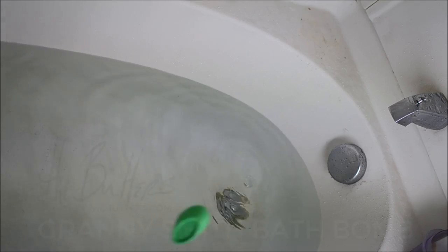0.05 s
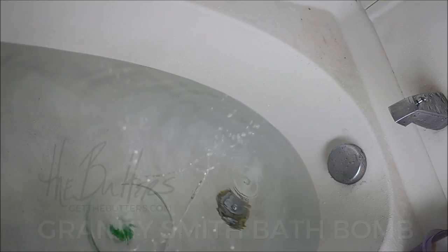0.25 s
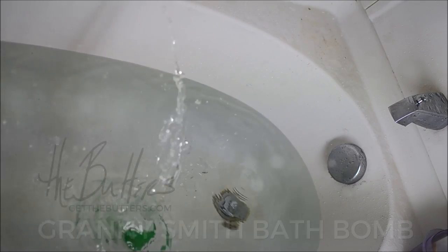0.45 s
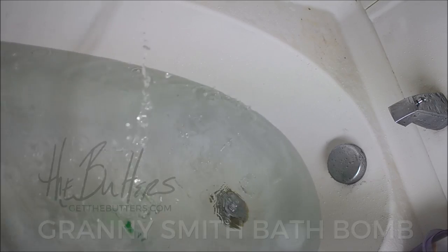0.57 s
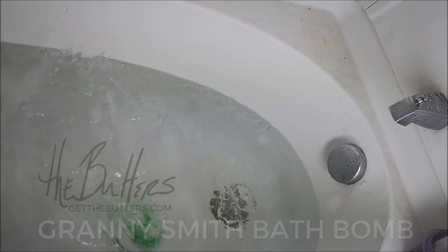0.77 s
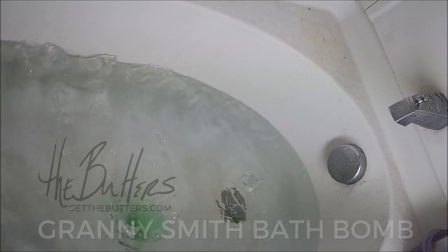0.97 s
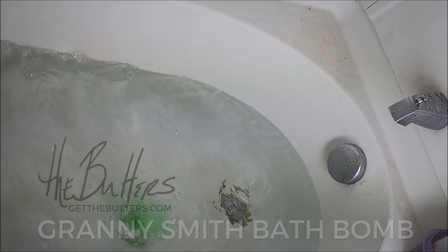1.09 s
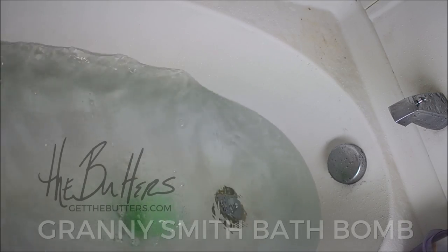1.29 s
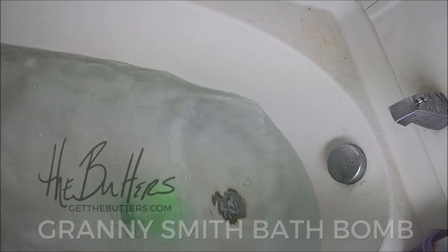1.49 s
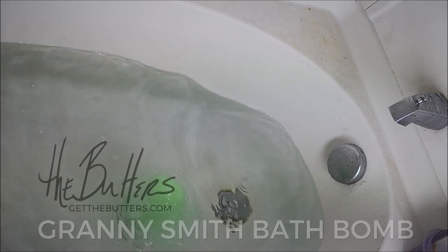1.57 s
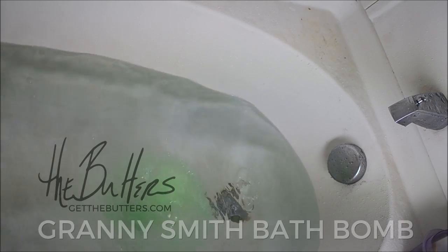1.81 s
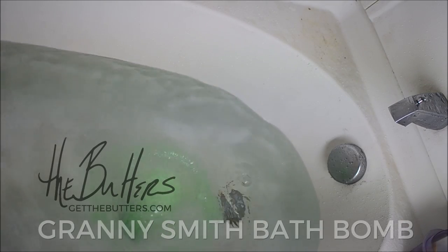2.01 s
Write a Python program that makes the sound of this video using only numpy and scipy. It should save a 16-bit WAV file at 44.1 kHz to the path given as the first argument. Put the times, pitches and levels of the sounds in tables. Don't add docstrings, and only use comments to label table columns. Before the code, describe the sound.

A solid ball plunges into a filled bathtub with a hard thud, splash and bubbling

```python
import sys
import numpy as np
from scipy import signal
from scipy.fft import rfft, irfft, next_fast_len
from scipy.io import wavfile
from scipy.ndimage import uniform_filter1d, map_coordinates

SR = 44100
rng = np.random.default_rng(int(sys.argv[2]) if len(sys.argv) > 2 else 0)


def int16_out(signal):
    q = np.round(np.clip(np.atleast_2d(signal).T, -1, 1) * 32767)
    wavfile.write(sys.argv[1], SR, q.astype(np.int16))


def nominal_scale(level):
    x = np.asarray(level, float) / 20
    return 10 ** x


N = 90404

# (frequency [Hz], density [dB per Hz])
HUM_SPECTRUM = [(30, -1), (70, -4.5), (200, -3.5), (620, -6.5), (1200, -9.5), (2500, -17), (5000, -34),
                (16000, -43)]
HUM_DB = -59

# (time [s], peak [dB], centre [Hz])
DROPLETS = [(0.0743, -46, 8650), (0.157, -36, 9300), (.373, -39, 8300), (0.435, -36, 6650),
            (.5203, -48, 6600), (0.582, -26.5, 6240), (.757, -39, 7400), (.838, -43.5, 7870),
            (0.867, -40, 5140), (0.89, -32, 11200), (0.986, -43.5, 10400), (0.9976, -42, 6240),
            (1.031, -46, 9000), (1.11, -48.5, 9900), (1.1753, -46, 12500), (1.176, -42, 4400),
            (1.2542, -47.5, 9200), (1.299, -52, 8850), (1.375, -54, 5500), (1.437, -43.5, 5450)]
DROPLET_T60_S, DROPLET_WIDTH_NEPER, DROPLET_DIRECT_DB = 0.014, 0.3, -8

# (frequency [Hz], level [dB], t60 [s])
LOW_MODES = [(76.3, -12.5, 0.58), (126.74, -10.5, 0.4), (173.6, -2, 0.17), (228.7, -3.5, 0.23),
             (323, -23, 0.29)]
HIGH_MODES = [(450, -26.5, 0.3), (652, -10, 0.31), (709.6, 2.5, 0.1), (779.3, -3.5, 0.14), (805, -17, 0.53),
              (954.4, -17, 0.35), (1342, -17.5, 0.43), (1560, -18.5, 0.33), (1705, -12.5, 0.18),
              (1793, -18.5, 0.24), (2110, -25, 0.5), (2133, -20, 0.25)]
# (time [s], level [dB], rise [s])
LOW_BLOWS = [
    (0.154, -46.5, 0.005),
    (0.2374, -32, 0.0043),
    (0.2612, -11, 0.0045),
    (0.2844, -13, 0.0036),
]
# (time [s], level [dB], rise [s])
HIGH_BLOWS = [
    (.2575, -8.5, 0.00067),
]
MODE_WANDER, MODE_WANDER_HZ, MODE_STEADY_S = 1.3, 35, 0.1

# (time [s], level [dB], rise [s], t60 [s], corner [Hz])
TORN_WATER = [(.156, -40.5, 0.00041, 0.042, 5200), (0.157, -40.5, 0.0038, 0.5, 1290),
              (0.236, -20, 0.0034, 0.28, 820), (0.2572, -15, 0.0012, 0.22, 1660),
              (0.258, -32, 0.00084, 0.12, 7100), (0.334, -44, 0.008, 0.11, 6300),
              (0.377, -35, 0.027, 0.27, 2230), (0.575, -40, 0.0068, 0.075, 5900),
              (0.633, -40.5, 0.022, 0.46, 6860), (0.664, -42, 0.0019, 0.19, 8900),
              (.86, -48, 0.092, 0.91, 450), (0.999, -45, 0.062, 0.33, 350),
              (0.888, -44.5, 0.00067, 0.068, 13000), (1.172, -49, .004, 0.087, 1500)]
TORN_WATER_SLOPE = 2.3

# (time [s], pitch [Hz], peak [dB], life [cycles])
SPLASH_BUBBLES = [(0.2348, 1476, -19, 7.7), (.236, 208.6, -6.5, 6.1), (.239, 973, -11.5, 6.3),
                  (.2385, 590, -30, 1.5), (.2608, 695, -1, 5), (.279, 683, -15.5, 12),
                  (.325, 653, -9.5, 8.1), (0.349, 916, -14.5, 11.4), (0.389, 167.4, -19.5, 6.4),
                  (0.466, 166.2, -26.5, 7.9), (.472, 555, -24, 4), (0.318, 1680, -14.5, 10.4),
                  (.388, 1670, -24, 28), (0.406, 2780, -25.5, 11.5), (.478, 359, -33.5, 18),
                  (0.527, 1344, -28.5, 18.5), (.552, 1470, -36, 23), (0.529, 2880, -42, 8),
                  (.542, 715, -28, 8.7), (0.56, 982, -29.5, 12), (0.5759, 2374, -22, 21),
                  (0.578, 6300, -31.5, 18), (0.602, 2560, -34, 16), (0.626, 3137, -32.5, 43),
                  (0.638, 6140, -38, 44), (.656, 1009, -11, 8.3), (0.668, 840, -11.5, 1.85),
                  (0.689, 1495, -34, 73), (0.698, 4470, -26, 22), (0.715, 3930, -26.5, 18),
                  (0.719, 1365, -29.5, 9.6), (.722, 625, -21.5, 5.8), (0.898, 3630, -45, 19)]
LATE_BUBBLES = [(.9, 341, -47, 15), (.92, 584, -36.5, 10.2), (1.044, 980, -32, 7.3),
                (1.049, 4000, -42.5, 29), (1.29, 346, -46, 20), (1.169, 230, -51, 4),
                (1.26, 3860, -53.5, 20), (1.436, 4850, -52, 28), (1.469, 1550, -45, 12),
                (1.498, 2000, -47.5, 14), (1.547, 2500, -47.5, 20), (1.652, 1043, -43, 12.4),
                (1.666, 2490, -42.5, 18), (1.697, 1420, -46.5, 16), (1.848, 2170, -44.5, 17),
                (1.98, 4100, -52, 25), (1.923, 2060, -46, 14), (1.925, 599, -48.5, 35),
                (2.022, 980, -50, 17)]
PITCH_RISE, ONSET_CYCLES = 0.12, 2.1
SATELLITE_DB, SATELLITE_SCATTER_DB, SATELLITE_DELAY_S, SATELLITE_SPREAD = -7, 3, 0.044, 0.067
LONE_BELOW_HZ = 450

# (time [s], level [dB], middle bubble pitch [Hz])
CHURN_COURSE = [(0.251, -43, 1405), (0.299, -30, 1264), (0.411, -41, 1210), (0.47, -64.5, 940),
                (0.521, -45.5, 1208), (0.579, -48, 2130), (0.651, -37.5, 1924), (0.679, -31.5, 1181),
                (0.73, -43.5, 1610), (0.781, -49.5, 2080), (0.831, -50.5, 2654), (0.952, -50.5, 1480),
                (1.029, -56.5, 1474), (1.063, -55.5, 1170), (1.098, -65.5, 935), (1.43, -64.5, 1078),
                (1.5, -60, 2080), (2.05, -56, 2020)]
CHURN_LIFE_CYCLES, CHURN_SPREAD, CHURN_SIZE_DB = 7, 0.45, 1.5
STRENGTH_CAP = 2.2
# (frequency [Hz], density [dB per Hz])
SPRAY_SPECTRUM = [(120, -49), (400, 5), (1000, -15), (3000, 4.5), (6000, -21), (11000, -20.5),
                  (16000, -40.5)]
SPRAY_DB = -8.5

# (time [s], level [dB], rise [s], t60 [s], centre [Hz], width [octaves])
FROTH_CLOUDS = [(0.377, -37, 0.0065, 0.21, 2710, 0.096), (.385, -38, .004, 0.18, 1760, 0.18),
                (0.574, -38.5, 0.0015, 0.23, 2430, 0.37), (.615, -35.5, 0.0087, 0.22, 1794, 0.24),
                (.666, -35.5, 0.0014, 0.25, 790, 0.54), (0.686, -35, 0.0077, 0.15, 1540, 0.089),
                (0.698, -42, 0.0019, 0.22, 5000, 0.18), (0.715, -40.5, .003, 0.25, 3900, 0.18),
                (.765, -50.5, 0.0068, 0.38, 640, 0.046), (.786, -36, 0.0054, 0.16, 2730, 0.15),
                (.84, -50, 0.0048, 0.32, 2430, 0.1), (0.939, -48.5, 0.0031, 0.15, 2880, 0.23),
                (1.0, -48, 0.011, 0.25, 3030, 0.22), (1.033, -37, 0.0095, 0.16, 930, .35),
                (1.173, -54, 0.0018, 0.14, 11200, 0.19), (1.365, -62, .004, .15, 3100, .2),
                (1.452, -55, 0.0059, 0.27, 1800, .25), (1.5, -59, 0.025, 0.53, 2380, .2),
                (1.55, -60, .04, .8, 3500, .25), (1.63, -57, 0.017, .5, 2200, .12),
                (1.649, -61, .02, 0.34, 3300, .15), (1.755, -55, 0.0054, 0.44, 914, .1),
                (1.86, -56, 0.014, 1.2, 923, 0.14), (1.9, -54.5, .03, 1.3, 2310, .2),
                (1.952, -60, .03, 1.1, 3650, 0.31)]

# (frequency [Hz], density [dB per Hz])
FIZZ_SPECTRUM = [(1500, -37), (3000, 0), (6000, -3.5), (11000, -4), (14000, -8), (16000, -14)]
FIZZ_DB, FIZZ_POP_DB, FIZZ_START_S, FIZZ_RISE_S = -65.5, -7, 0.64, 1

# (frequency [Hz], t60 [s])
ROOM_T60 = [(150, 0.69), (800, 0.28), (3000, 0.037), (8000, 0.21), (15000, 0.25)]
WATER_WET_DB, SHELL_WET_DB, ROOM_GAP_S = -8.5, -15, 0.0049

# (time [s], length [s], from [Hz], to [Hz])
BAND_LOSSES = [(.326, .009, 3800, 20000), (.389, .011, 3800, 20000), (.794, .008, 5200, 20000),
               (.79, .014, 3350, 3750), (.79, .014, 1750, 2200), (.787, .018, 750, 1300),
               (.787, .018, 250, 520), (.923, .006, 4300, 20000), (.915, .02, 3000, 3500)]
BAND_LOSS_DB = -45
# (frequency [Hz], gain [dB])
BAND_TOP = [(15720, 0), (15800, -24), (16400, -28), (16500, -90)]
MIC_LOW_HZ, MIC_TOP_HZ, START_S = 52, 19000, 0.0115


def unit(x):
    return x / np.sqrt(np.mean(x ** 2) + 1e-20)


def along(points, hz):
    f, v = np.transpose(points)
    return np.interp(np.log(hz + 1), np.log(f + 1), v)


def filtered(x, response):
    m = next_fast_len(len(x) + 8192)
    spectrum = rfft(x, m) * response(np.fft.rfftfreq(m, 1 / SR))
    return irfft(spectrum, m)[:len(x)]


def hiss(spectrum, patchy_db):
    z = signal.stft(rng.standard_normal(N), nperseg=256)[2]
    field = uniform_filter1d(rng.standard_normal(z.shape), 5, 0)
    field = unit(uniform_filter1d(field, 8, 1))
    x = signal.istft(z * nominal_scale(patchy_db * field), nperseg=256)[1][:N]
    return unit(filtered(x, lambda hz: nominal_scale(along(spectrum, hz))))


def add(out, s, x):
    part = out[round(s * SR):][:len(x)]
    part += x[:len(part)]


def swell(t, db, rise, t60):
    return nominal_scale(db - 60 * t / t60) * -np.expm1(-t / rise)


def bubbles(s, hz, db, cycles, size):
    s, hz, db, cycles = (np.asarray(v)[:, None] for v in (s, hz, db, cycles))
    n = np.arange(size)
    turns = hz * n / SR
    age = turns / cycles
    envelope = nominal_scale(db - 20 * age) * -np.expm1(-turns / ONSET_CYCLES)
    wave = envelope * np.sin(2 * np.pi * turns * (1 + PITCH_RISE * np.tanh(age) / 2))
    place = (s * SR).astype(int) + n
    return np.bincount(place.ravel(), wave.ravel(), N + size)[:N]


def house_hum():
    return nominal_scale(HUM_DB) * hiss(HUM_SPECTRUM, patchy_db=1)


def droplets():
    out, t = np.zeros(N), np.arange(SR // 20) / SR
    for s, db, hz in DROPLETS:
        noise = filtered(rng.standard_normal(len(t)),
                         lambda f: np.exp(-.5 * (np.log((f + 1) / hz) / DROPLET_WIDTH_NEPER) ** 2))
        add(out, s, nominal_scale(db - 60 * t / DROPLET_T60_S) * unit(noise))
    return out


def tub_shell():
    out, t = np.zeros(N), np.arange(SR) / SR
    wander = MODE_WANDER * -np.expm1(-t / MODE_STEADY_S)
    for modes, blows in ((LOW_MODES, LOW_BLOWS), (HIGH_MODES, HIGH_BLOWS)):
        knots = rng.standard_normal((len(modes), 2, 100))
        ring = 0
        for k, (hz, db, t60) in enumerate(modes):
            sway, slip = (wander * map_coordinates(v, [t * MODE_WANDER_HZ]) for v in knots[k])
            level = nominal_scale(db - 60 * t / t60 + 1.5 * sway)
            ring = ring + (-1) ** k * level * np.sin(2 * np.pi * hz * t + slip)
        for s, db, rise in blows:
            add(out, s, nominal_scale(db) * ring * -np.expm1(-t / rise))
    return out


def torn_water():
    out, t = np.zeros(N), np.arange(SR // 2) / SR
    for s, db, rise, t60, hz in TORN_WATER:
        noise = filtered(rng.standard_normal(len(t)),
                         lambda f: f * f / (f * f + (0.2 * hz) ** 2) / (1 + (f / hz) ** TORN_WATER_SLOPE))
        add(out, s, swell(t, db, rise, t60) * unit(noise))
    return out


def single_bubbles(count):
    s, hz, db, cycles = np.transpose([*SPLASH_BUBBLES, *LATE_BUBBLES])[:, :, None]
    draw = np.clip(rng.standard_normal((len(s), 3, count)), -2, 2)
    wait = SATELLITE_DELAY_S * np.abs(draw[:, 0])
    cloud_s = s + 0.0037 + wait
    cloud_hz = hz * np.exp(SATELLITE_SPREAD * draw[:, 1])
    cloud_db = db + SATELLITE_DB - 60 * (hz < LONE_BELOW_HZ)
    cloud_db = cloud_db - 6 * wait / SATELLITE_DELAY_S + SATELLITE_SCATTER_DB * draw[:, 2]
    cloud = (cloud_s, cloud_hz, cloud_db, 0.54 * cycles + 0 * wait)
    leaders = bubbles(s[:, 0], hz[:, 0], db[:, 0], cycles[:, 0], size=6000)
    return leaders + bubbles(*(v.ravel() for v in cloud), size=3000)


def churn(count):
    at, level_db, pitch_hz = np.transpose(CHURN_COURSE)
    draw = np.clip(rng.standard_normal((count, 2)), -2, 2)
    s = rng.uniform(0, N / SR, count)
    hz = np.interp(s, at, pitch_hz) * np.exp(CHURN_SPREAD * draw[:, 0])
    hz = np.clip(hz, 250, 12000)
    strength = np.minimum(rng.exponential(1, count), STRENGTH_CAP)
    size_db = CHURN_SIZE_DB * strength - 0.5 * draw[:, 0] ** 2
    cycles = CHURN_LIFE_CYCLES * np.exp(0.27 * draw[:, 1])
    swarm = unit(bubbles(s, hz, size_db, cycles, size=1200))
    gain = nominal_scale(np.interp(np.arange(N) / SR, at, level_db, left=-120))
    return gain * (swarm + nominal_scale(SPRAY_DB) * hiss(SPRAY_SPECTRUM, patchy_db=6.0))


def froth():
    out, t = np.zeros(N), np.arange(SR // 2) / SR
    for s, db, rise, t60, hz, octaves in FROTH_CLOUDS:
        noise = filtered(rng.standard_normal(len(t)),
                         lambda f: np.exp(-.5 * (np.log2((f + 1) / hz) / octaves) ** 2))
        add(out, s, swell(t, db, rise, t60) * unit(noise))
    return out


def fizz(count):
    t = np.arange(N) / SR
    strength = rng.standard_normal(count) * np.minimum(rng.exponential(1, count), STRENGTH_CAP)
    pops = np.bincount(rng.integers(0, N, count), strength, N)
    pops = unit(filtered(pops, lambda hz: nominal_scale(along(FIZZ_SPECTRUM, hz))))
    even = hiss(FIZZ_SPECTRUM, patchy_db=0.4)
    growth = np.sqrt(np.clip((t - FIZZ_START_S) / FIZZ_RISE_S, 0, 1))
    return nominal_scale(FIZZ_DB) * growth * (even + nominal_scale(FIZZ_POP_DB) * pops)


def room():
    hz, t, z = signal.stft(rng.standard_normal(SR // 2), SR, nperseg=256)
    decay = nominal_scale(-60 * t / along(ROOM_T60, hz)[:, None])
    tail = signal.istft(z * decay, SR, nperseg=256)[1]
    return np.pad(tail / np.linalg.norm(tail), (round(ROOM_GAP_S * SR), 0))


def scene():
    hum, drops, tub = house_hum(), droplets(), tub_shell()
    water = torn_water() + single_bubbles(count=16) + churn(count=4000) + froth() + fizz(count=1500)
    water_wet = nominal_scale(WATER_WET_DB) * signal.fftconvolve(water + drops, room())[:N]
    tub_wet = nominal_scale(SHELL_WET_DB) * signal.fftconvolve(tub, room())[:N]
    direct = tub + water + nominal_scale(DROPLET_DIRECT_DB) * drops
    return (direct + water_wet + tub_wet + hum)[None]


def roll_off(x):
    return signal.sosfilt(signal.butter(12, 16460, fs=SR, output="sos"), x)


def record(dry):
    mic = signal.butter(3, [MIC_LOW_HZ, MIC_TOP_HZ], "band", fs=SR, output="sos")
    heard = signal.sosfilt(mic, dry[0])
    t = np.arange(N) / SR
    for s, length, low_hz, high_hz in BAND_LOSSES:
        gap = uniform_filter1d(1. * ((t > s) & (t < s + length)), size=260)
        band = filtered(heard, lambda f: (f > low_hz) & (f < high_hz))
        heard = heard - (1 - nominal_scale(BAND_LOSS_DB)) * gap * band
    mix = filtered(heard * (t > START_S), lambda f: nominal_scale(along(BAND_TOP, f)))
    return roll_off(mix)


dry = scene()
out = record(dry)
int16_out(out)
```